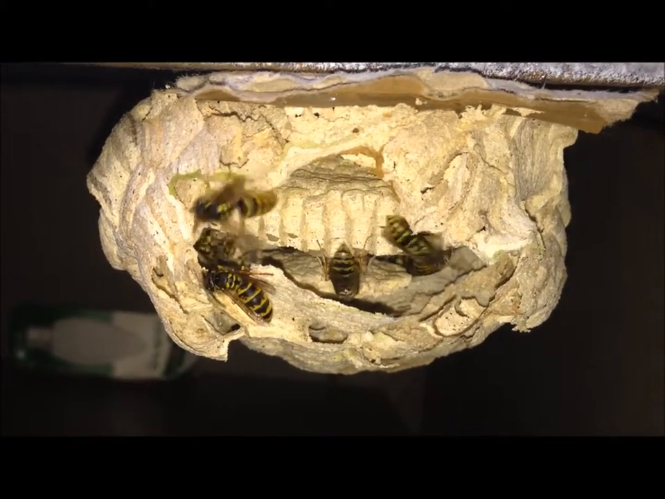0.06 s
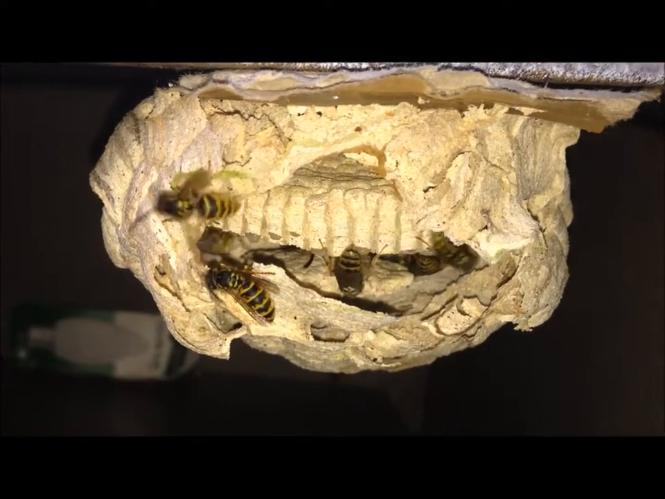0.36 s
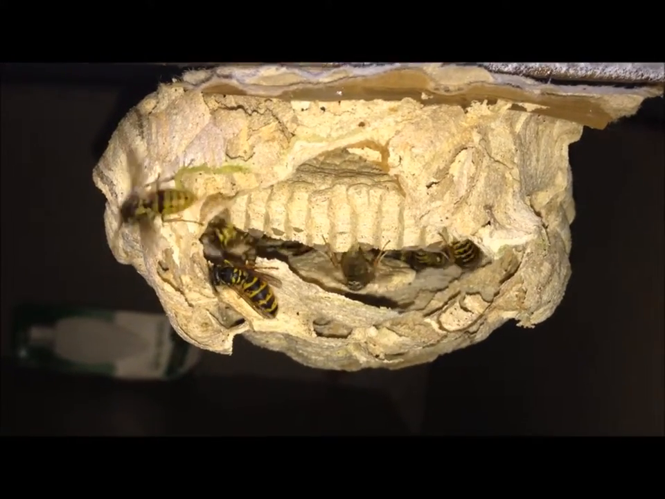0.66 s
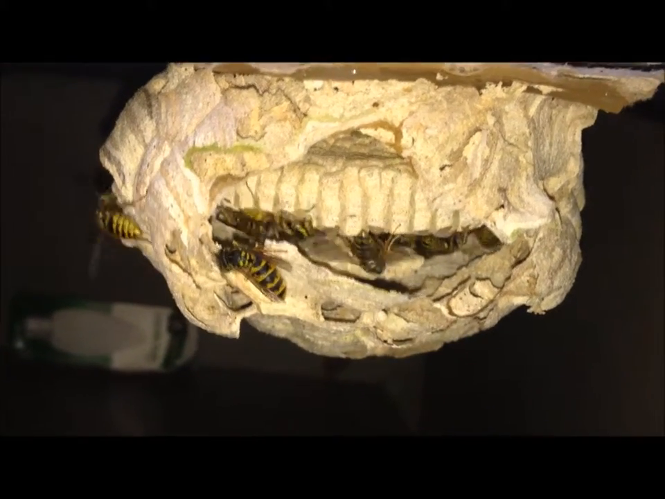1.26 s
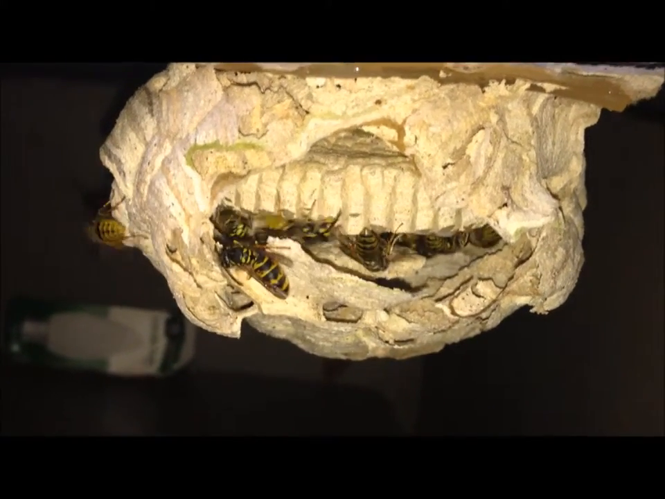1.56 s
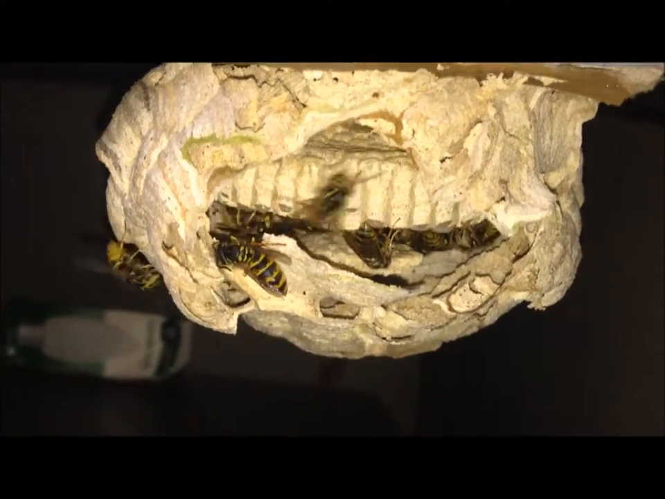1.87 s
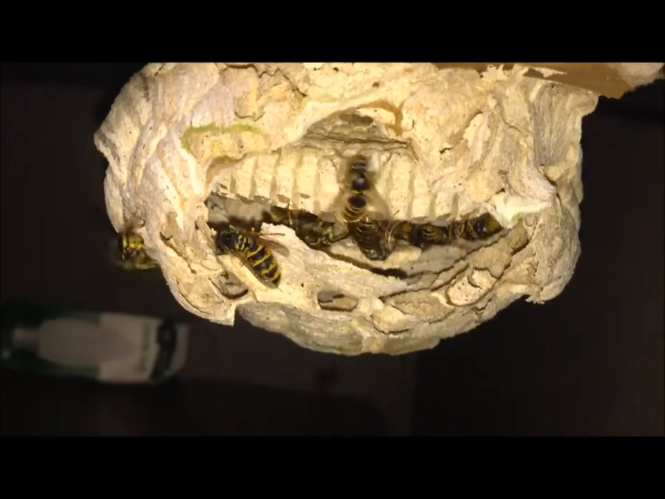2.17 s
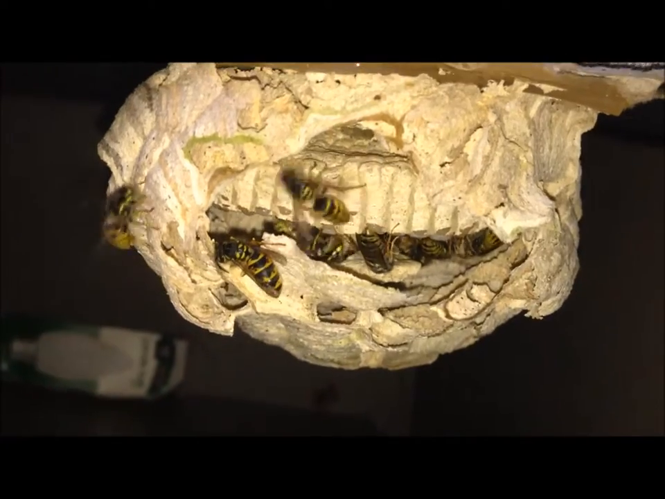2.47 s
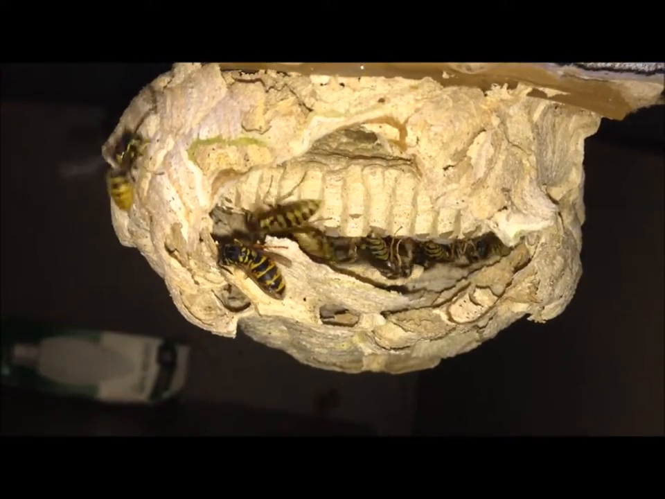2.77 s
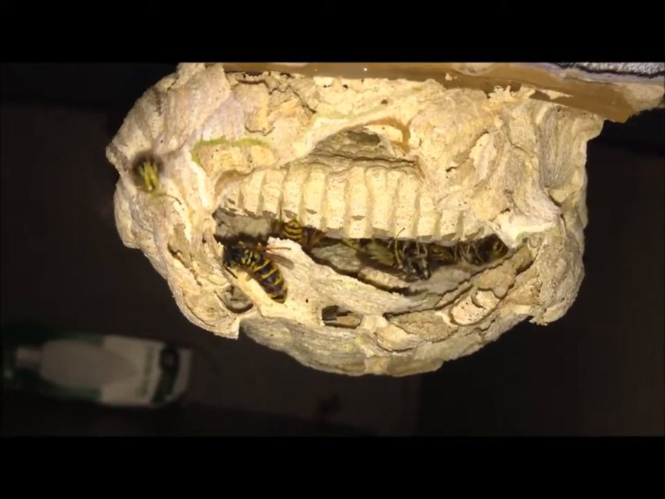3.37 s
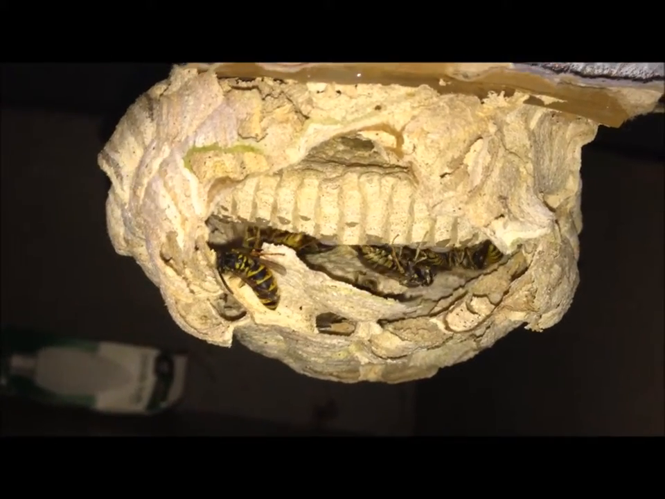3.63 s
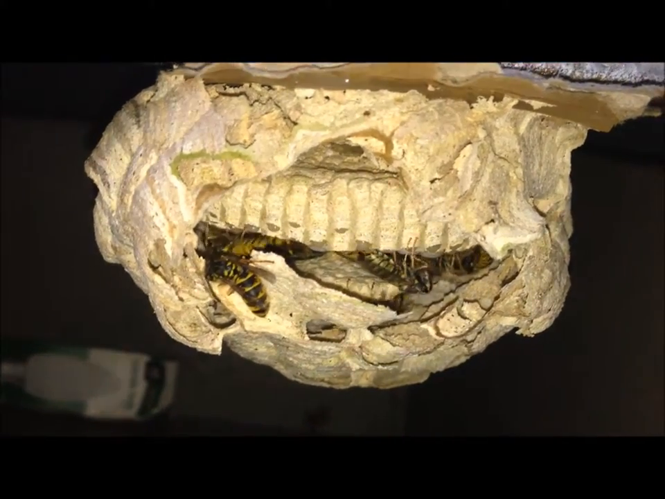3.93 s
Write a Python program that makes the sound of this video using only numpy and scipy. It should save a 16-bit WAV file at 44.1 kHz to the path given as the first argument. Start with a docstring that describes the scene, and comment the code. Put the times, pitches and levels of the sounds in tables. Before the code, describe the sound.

Small clicks and dull bumps of a handled microphone over faint hiss and wasp hum.

```python
"""Small wasp nest, hand-held

A quiet, dry place, with one camera microphone held close to the nest. The wasps' wing muscles hum
faintly under low room noise and microphone hiss, with a few brief buzzes. Right at the microphone the
camera's case rubs, bumps and ticks as the grip shifts: each tick is one short pressure step, which
the microphone's low cut turns into a small, dull pop."""
import sys
import numpy as np
from scipy import signal
from scipy.fft import rfft, irfft
from scipy.io import wavfile
from scipy.ndimage import uniform_filter1d

SR = 44100
rng = np.random.default_rng(int(sys.argv[2]) if len(sys.argv) > 2 else 0)


def wrap_up_sound(samples):
    """Save the sound to the file named by the first command line argument, as 16-bit audio."""
    columns = np.atleast_2d(samples).T
    # keep every value between -1 and 1, then stretch to whole-number steps
    tamed = np.clip(columns, -1, 1)
    steps = np.round(tamed * 32767).astype(np.int16)
    wavfile.write(sys.argv[1], SR, steps)


N = 176400

# spectrum of the room noise: f/Hz, level/dB
ROOM_SPECTRUM = [(20, -38), (45, -22.5), (75, -12.5), (120, -2.5), (180, 0), (250, -10), (300, -14.5),
                 (370, -11), (480, -16), (800, -22), (1600, -30.5), (5000, -50)]
# spectrum of the microphone's hiss: f/Hz, level/dB
HISS_SPECTRUM = [(100, -5), (800, 0), (1500, -1.5), (2500, -2.5), (4000, -4.5), (6300, -8.5), (8500, -13.5),
                 (10300, -15.5), (13000, -8), (15500, -7.5)]
# rubbing of the grip over time: t/s, level/dB
RUB_LEVELS = [(0, -77.5), (1.95, -86.5), (2.18, -66.5), (2.27, -57.5), (2.35, -57), (2.45, -50.5),
              (2.53, -58.5), (2.62, -74.5), (2.76, -68), (2.86, -60), (3.02, -70), (3.25, -70), (3.45, -92),
              (3.72, -79), (3.88, -63.5), (3.95, -56.5), (3.98, -52), (4, -59)]
# spectrum of the rubbing, heard through the camera's body: f/Hz, level/dB
RUB_SPECTRUM = [(25, -34), (60, -6), (120, 2), (220, 4), (350, -4.5), (600, -11), (1200, -20.5),
                (2500, -30.5), (6000, -42), (15000, -65)]
# soft bumps of the hand: t/s, level/dB, f/Hz, swell time/s
HAND_BUMPS = [(0.0722, -39.5, 153, 0.0059), (0.643, -54.5, 135, .006), (2.002, -55.5, 121, 0.0044),
              (2.015, -49, 126, 0.0047), (2.139, -45, 134, 0.0072), (2.162, -48, 130, 0.0052),
              (2.223, -47.5, 129, 0.0079), (2.261, -45, 180, 0.0043), (2.595, -56.5, 104, .008),
              (2.9418, -36, 126, 0.0034), (3.329, -56, 188, 0.0043), (3.449, -52.5, 135, 0.0035),
              (3.796, -49.5, 162, 0.0054)]
# ticks of the case: t/s, level of the push before filtering/dB, contact time/ms
CASE_TICKS = [(0.0714, -31.5, 0.29), (1.0695, -41.5, 0.03), (1.1848, -45.5, .025), (1.5065, -50.5, .025),
              (1.658, -47, 0.017), (2.3581, -17, 0.038), (2.4110, -24.5, 0.035), (2.4198, -17.5, 0.21),
              (2.4207, -18, 0.04), (2.4343, -24, 0.029), (2.4524, -33.5, 0.024), (2.5494, -21, 0.041),
              (2.5577, -30, 0.056), (2.5832, -34.5, 0.075), (2.6727, -34.5, 0.032), (2.7279, -34, 0.12),
              (2.7339, -42.5, 0.028), (2.8314, -35, 0.038), (2.8487, -40, 0.13), (2.9313, -45, .03),
              (2.9410, -18.5, 0.15), (2.942, -15.5, 0.04), (3.0760, -35.5, 0.04), (3.1002, -45.5, 0.077),
              (3.1739, -42, 0.19), (3.2184, -31, 0.035), (3.2511, -35.5, 0.027), (3.2680, -35, 0.052),
              (3.3728, -44, 0.033), (3.6640, -21.5, 0.032), (3.895, -10, 0.067), (3.9569, -19.5, 0.24),
              (3.9702, -24, 0.034)]
# the microphone's two high-pass stages: f/Hz, Q
MIC_LOW_CUT = [(122, 2.07), (208, 1.175)]
# humming wasps, one a row: f/Hz, level/dB
WASP_HUMS = [(173.3, -67.5), (180.4, -73.5), (141, -73)]
# harmonics of a hum, from the fundamental up: relative level/dB
HUM_HARMONICS = [-3.5, -10.5, -27.5, -22.5]
# brief bursts of wing buzz: t/s, length/s, f/Hz, level/dB
WING_BUZZES = [(1.555, 0.062, 190, -51), (1.573, 0.23, 218, -68), (3.617, 0.46, 207.6, -60)]
# harmonics of a buzz, from the fundamental up: relative level/dB
BUZZ_HARMONICS = [-1.5, -16.5, -23, -23.5, -28.5, -29]

ROOM_DB, HISS_DB = -67, -72
SLIPS_PER_S, SLIP_SCATTER_DB = 4000, 2
BUMP_LOW_CUT_HZ, HIGH_CUT_HZ = 60, 15500
TICK_RELAX_MS = 0.53
PORT_HZ, PORT_Q, PORT_DB = 14800, 6.2, 12.5  # resonance of the microphone port
HUM_WANDER, BUZZ_WANDER = 0.03014, 0.0119  # spread of the pitch, as a fraction of it
HUM_FLUTTER_DB = 3


def undb(db):
    """Decibels to gain."""
    return 10 ** (np.asarray(db) / 20)


def colour(sound, spectrum):
    """Shape a sound by points of f/Hz, level/dB; the result has rms 1."""
    hz, db = np.array(spectrum, float).T
    bin_hz = np.maximum(np.fft.rfftfreq(N, 1 / SR), 1)
    gain = undb(np.interp(np.log(bin_hz), np.log(hz), db))
    shaped = irfft(rfft(sound) * gain, N)
    return shaped / shaped.std()


def drift(steps_per_s):
    """Smooth random drift with spread 1."""
    hold = int(SR / steps_per_s)
    steps = np.repeat(rng.standard_normal(N // hold + 1), hold)
    smooth = uniform_filter1d(uniform_filter1d(steps, hold), hold)[:N]
    return smooth / smooth.std()


def add(out, start, sound):
    """Mix a sound in at a time in seconds."""
    i = int(round(start * SR))
    out[i:i + len(sound)] += sound[:N - i]


def room_and_hiss():
    """Low noise of the room and the even hiss of the microphone."""
    room = undb(ROOM_DB) * colour(rng.standard_normal(N), ROOM_SPECTRUM)
    hiss = undb(HISS_DB) * colour(rng.standard_normal(N), HISS_SPECTRUM)
    return room + hiss


def grip_rub():
    """Skin creeps over the case: dense tiny slips reach the microphone dully through the body."""
    slipping = rng.random(N) < SLIPS_PER_S / SR
    slips = slipping * rng.standard_normal(N) * undb(SLIP_SCATTER_DB * rng.standard_normal(N))
    level_db = np.interp(np.arange(N) / SR, *np.array(RUB_LEVELS).T)
    return colour(slips, RUB_SPECTRUM) * undb(level_db)


def hand_bumps():
    """The hand pushes softly on the case: a few low cycles that swell and die."""
    out, t = np.zeros(N), np.arange(SR // 5) / SR
    for start, db, hz, swell in HAND_BUMPS:
        envelope = (t / swell * np.exp(1 - t / swell)) ** 2
        add(out, start, -undb(db) * envelope * np.sin(2 * np.pi * hz * t))
    return signal.sosfilt(signal.butter(2, BUMP_LOW_CUT_HZ, "high", fs=SR, output="sos"), out)


def case_ticks():
    """Each pressure step rises over its contact time, relaxes, and swings back through the low cut."""
    size = 4096
    s = 2j * np.pi * np.fft.rfftfreq(size, 1 / SR)
    s_ms = s / 1000
    pop = SR / 1000 * TICK_RELAX_MS / (1 + s_ms * TICK_RELAX_MS)  # spectrum of a unit step dying away
    for hz, q in MIC_LOW_CUT:
        corner = 2 * np.pi * hz
        pop *= s ** 2 / (s ** 2 + s * corner / q + corner ** 2)
    s_port = s / (2 * np.pi * PORT_HZ)
    damping = s_port / PORT_Q
    port_peak = (s_port ** 2 + undb(PORT_DB) * damping + 1) / (s_port ** 2 + damping + 1)
    out = np.zeros(N)
    for start, db, contact_ms in CASE_TICKS:
        rise = 1 / (1 + s_ms * contact_ms) ** 2  # longer contact, duller tick
        add(out, start, undb(db) * irfft(pop * port_peak * rise)[:size // 2])
    return out


def wingbeat(hz, wander, harmonics_db):
    """Wing muscles vibrate in a harmonic tone whose pitch wavers."""
    pitch_hz = hz * (1 + wander * drift(steps_per_s=22))
    phase = 2 * np.pi * np.cumsum(pitch_hz) / SR
    return sum(undb(db) * np.sin(k * phase) for k, db in enumerate(harmonics_db, 1))


def wasp_nest():
    """Close by, three wasps hum all along, wavering in strength; brief buzzes swell and fade."""
    out, t = np.zeros(N), np.arange(N) / SR
    for hz, db in WASP_HUMS:
        hum = wingbeat(hz, HUM_WANDER, HUM_HARMONICS)
        out += hum * undb(db + HUM_FLUTTER_DB * drift(steps_per_s=13))
    for start, length, hz, db in WING_BUZZES:
        swell = np.sin(np.pi * np.clip((t - start) / length, 0, 1))
        out += undb(db) * swell * wingbeat(hz, BUZZ_WANDER, BUZZ_HARMONICS)
    return out


def scene():
    """Everything reaches one microphone at close range, without echo."""
    return (room_and_hiss() + grip_rub() + case_ticks() + hand_bumps() + wasp_nest())[None]


def record(dry):
    """The recorder cuts the top treble steeply."""
    return signal.sosfilt(signal.ellip(10, .1, 60, HIGH_CUT_HZ, fs=SR, output="sos"), dry)


dry = scene()
out = record(dry)
wrap_up_sound(out)
```